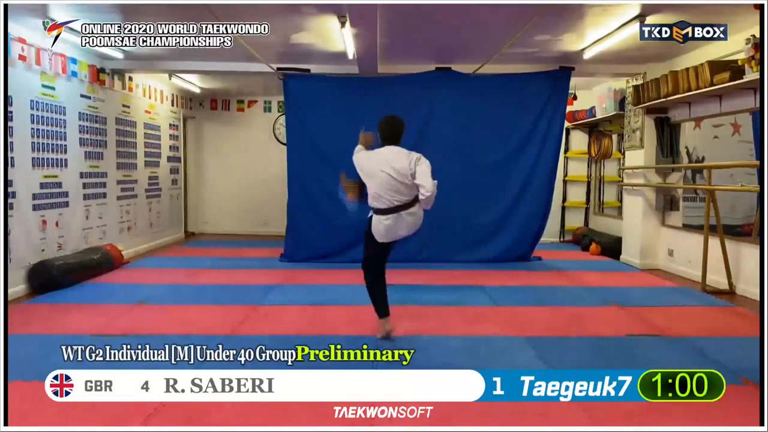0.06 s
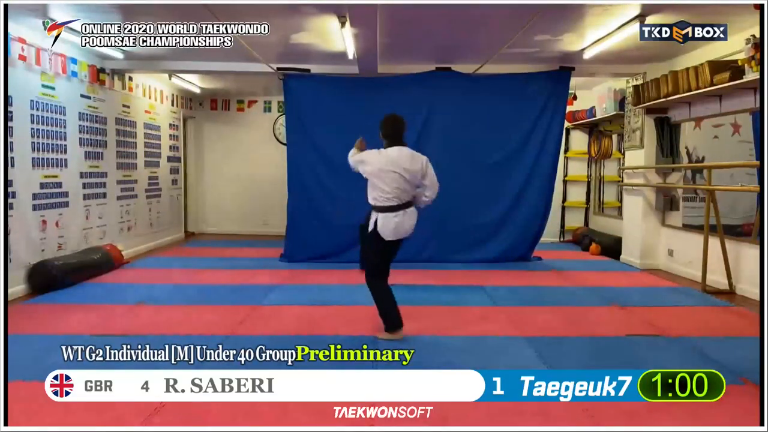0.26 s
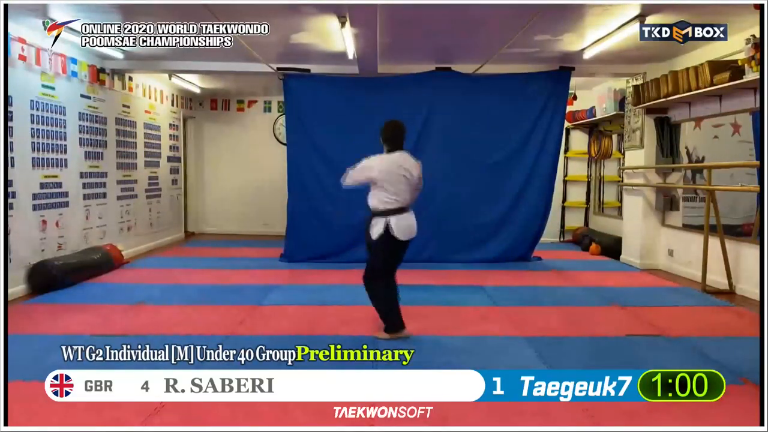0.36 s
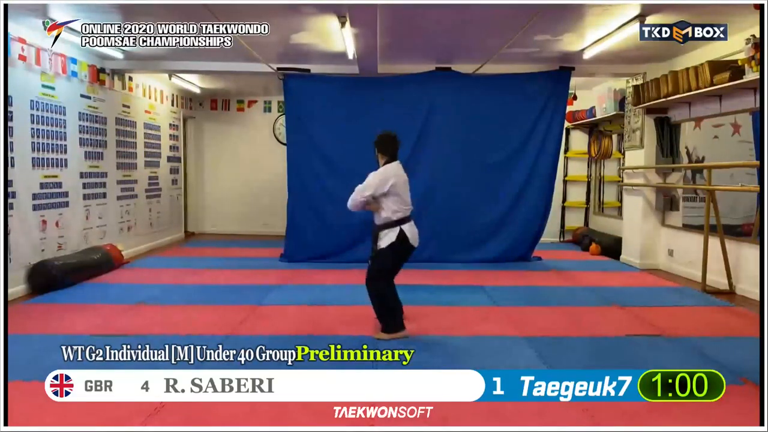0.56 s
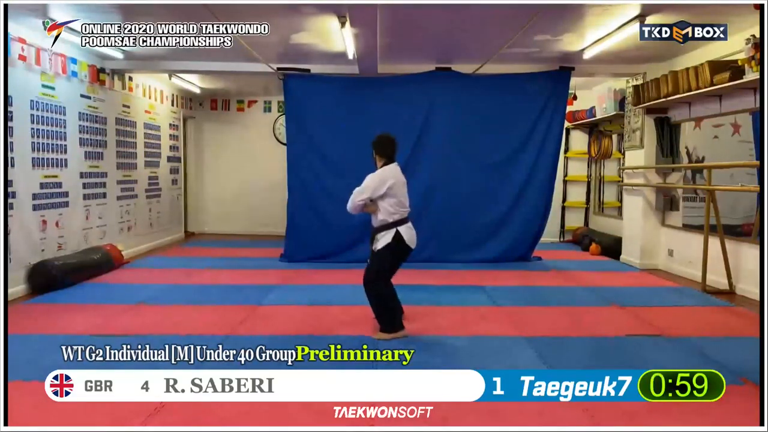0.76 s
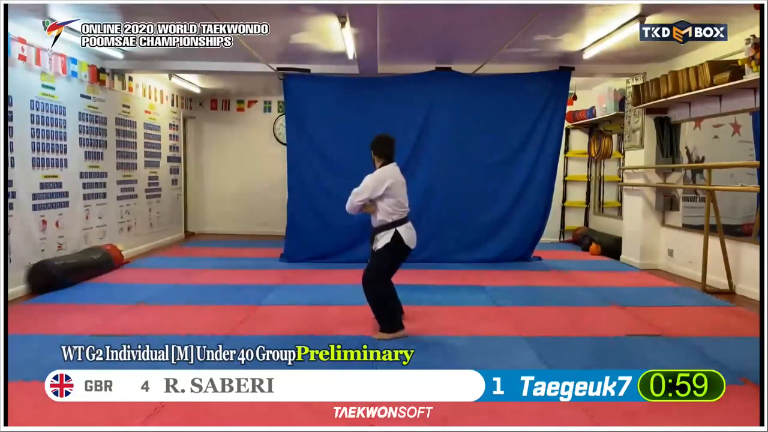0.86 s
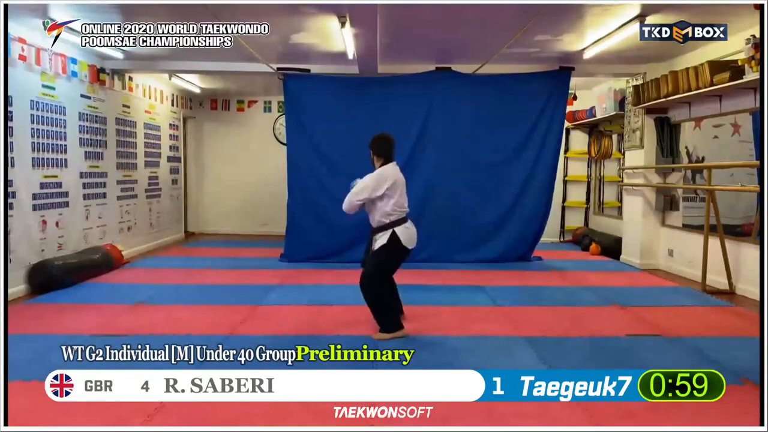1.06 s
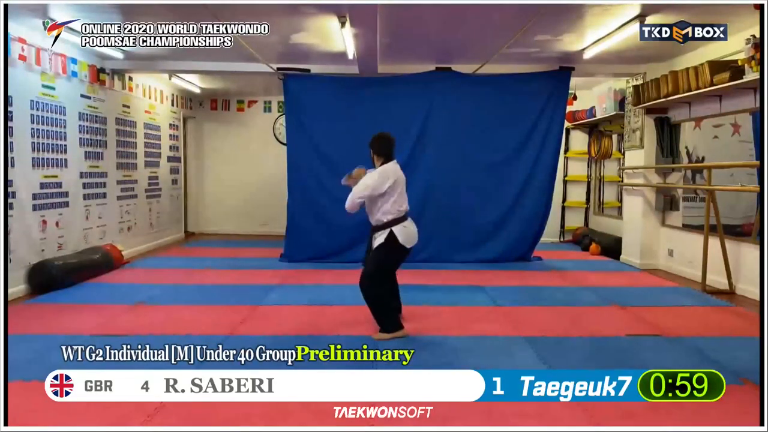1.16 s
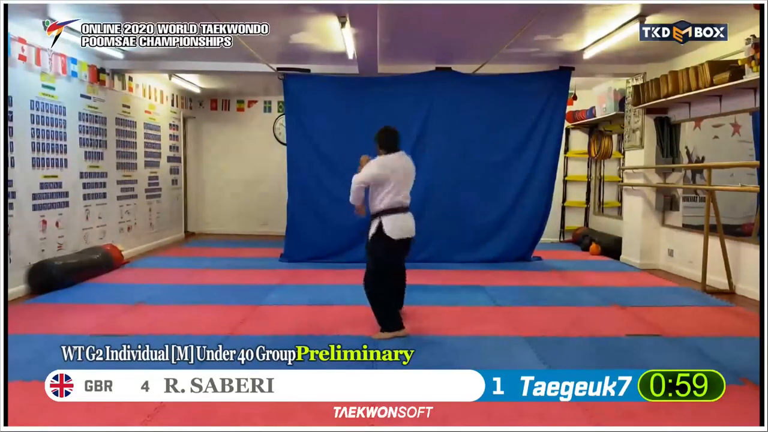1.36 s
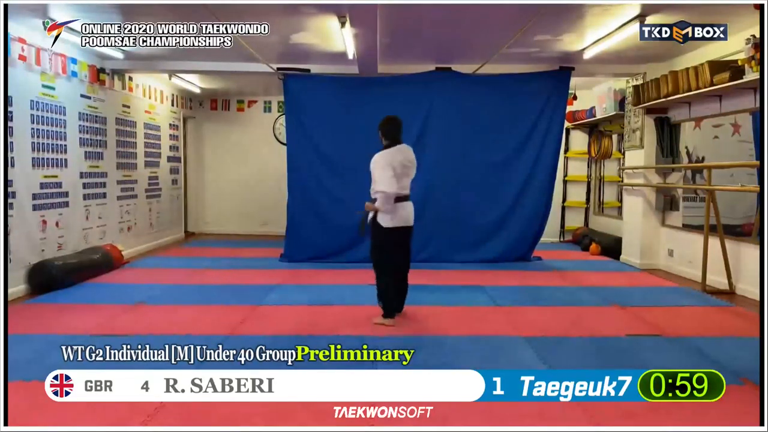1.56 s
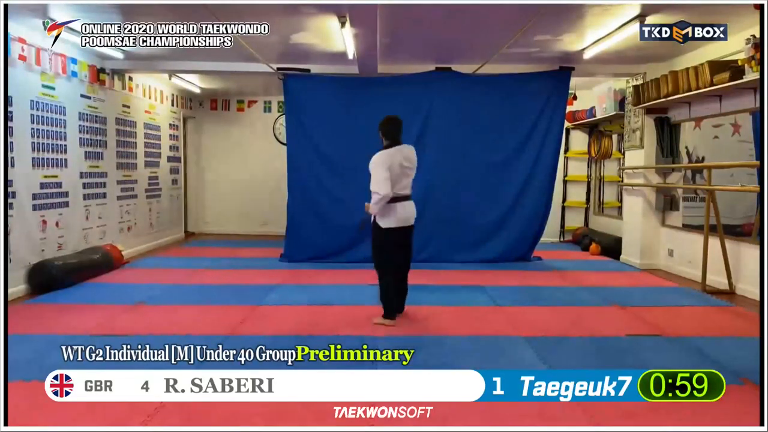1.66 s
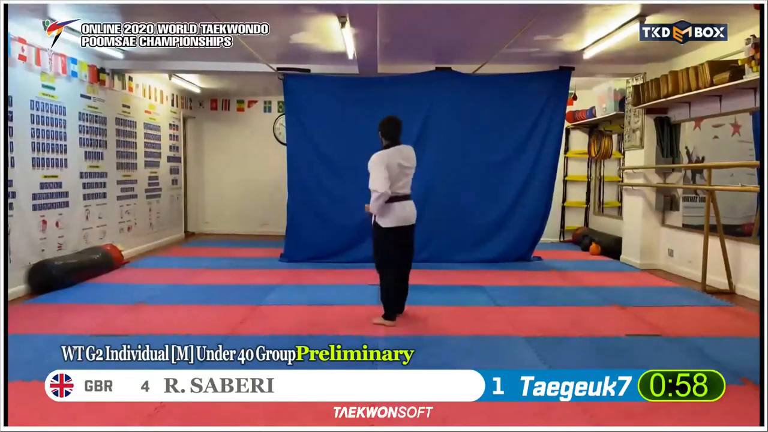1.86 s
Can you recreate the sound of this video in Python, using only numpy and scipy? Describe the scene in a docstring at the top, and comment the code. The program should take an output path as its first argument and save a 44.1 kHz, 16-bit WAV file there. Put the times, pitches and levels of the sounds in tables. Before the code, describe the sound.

A loose cotton uniform rustles at the start, then cracks hard in a tight cluster of snaps at about 0.2 seconds as a foot thuds on foam mats. A thin hem flick and swish fade by 0.5, with bare-room ringing and a deep floor boom. Near quiet follows over faint ventilation rumble. At 1.2 a softer step lands, with sleeves swishing until about 1.35, then quiet returns.

```python
"""A martial artist in a loose cotton uniform lands on foam mats and strikes: cloth cracks taut, the foot thuds.
A second later he draws up with a softer step and a long swish of sleeves.
Snaps and steps are pressure pulses with noise flutter; swishes are noise and crease clicks under slow envelopes.
The bare training room rings after each move; a deep floor mode and low ventilation rumble lie beneath."""
import sys
import numpy as np
from scipy import signal
from scipy.fft import rfft, irfft, next_fast_len
from scipy.io import wavfile

SR = 44100
rng = np.random.default_rng(int(sys.argv[2]) if len(sys.argv) > 2 else 0)


def put_to_file(sound):
    """Save the sound as 16-bit audio at rate SR, in the file named by the first command-line argument."""
    columns = np.atleast_2d(sound).T  # one column per channel
    safe = np.clip(columns, -1, 1)
    whole_steps = np.round(safe * 32767)
    wavfile.write(sys.argv[1], SR, whole_steps.astype(np.int16))


N = 83790


def amp(db):
    """Level to amplitude ratio: 20 dB is a factor of ten."""
    return 10 ** (np.asarray(db) / 20)


def along(points, hz):
    """Interpolation of (frequency, value) points on a logarithmic frequency axis."""
    f, v = np.transpose(points)
    return np.interp(np.log(hz + 1), np.log(f + 1), v)


def unit(x):
    """Normalisation to an rms of 1."""
    return x / np.sqrt(np.mean(x ** 2) + 1e-20)


def filtered(x, response):
    """Linear filtering: the spectrum of x times a response of frequency."""
    size = next_fast_len(x.shape[-1] + SR // 4)  # zero padding holds the filter's ringing
    spectrum = rfft(x, size) * response(np.fft.rfftfreq(size, 1 / SR))
    return irfft(spectrum, size)[..., :x.shape[-1]]


def spectral_gain(colour, tilt_db, hz):
    """Spectral envelope: a colour curve plus a tilt in dB per octave above 100 Hz."""
    return amp(along(colour, hz) + tilt_db * np.log2(np.maximum(hz, 100)))


def coloured(x, colour):
    """Spectral shaping of x by a colour curve, at rms 1."""
    return unit(filtered(x, lambda hz: spectral_gain(colour, 0, hz)))


def diffuse(size):
    """Diffuse field: stereo noise, correlated in the bass and far less so in the treble."""
    # left-right likeness: (frequency [Hz], correlation [-1 to 1])
    likeness = [(60, .95), (130, 0.82), (290, 0.86), (640, -0.0042), (1400, 0.081), (7000, 0.18),
                (15000, -0.75)]
    correlation = np.clip(along(likeness, np.fft.rfftfreq(size, 1 / SR)), -.99, .99)
    turn = np.arccos(correlation) / 2
    spectra = rfft(rng.standard_normal((2, size))) * [np.cos(turn), np.sin(turn)]
    mid, side = irfft(spectra, size)
    return np.array([mid + side, mid - side])


def fade(t, t60):
    """Exponential decay by 60 dB in t60 seconds."""
    return np.exp(-np.log(1000) * t / t60)


def blow(start, attack, t60, size=N):
    """Impact envelope: a saturating rise times an exponential decay."""
    t = np.maximum(np.arange(size) / SR - start, 0)
    return (1 - np.exp(-t / attack)) * fade(t, t60)


def ventilation_rumble():
    """Broadband flow noise: steady diffuse noise weighted to the bass."""
    # rumble spectrum: (frequency [Hz], level [dB])
    rumble_colour = [(20, -16), (35, -9.5), (58, 3.5), (80, -3), (102, -1), (140, -11.5), (290, -12.5),
                     (450, -29), (800, -22.5), (1500, -29.5), (3000, -40), (6000, -50.5), (15000, -65)]
    return amp(-57) * coloured(diffuse(size=N), rumble_colour)


def floor_boom():
    """Modal vibration: one deep mode of the floor flexes under the shifting weight."""
    # booms: (time [s], level of the decay without its slow rise [dB], t60 [s])
    booms = [(0.214, -32, 0.68), (0.601, -40, 0.42), (1.376, -38.5, 0.37), (1.781, -42.5, 0.41)]
    mode_hz, attack_s = 49.7, 0.095
    t = np.arange(N) / SR
    out = np.zeros(N)
    for s, db, t60 in booms:
        out += amp(db) * blow(s, attack_s, t60) * np.sin(2 * np.pi * mode_hz * (t - s))
    return out


def room(x):
    """Reverberation: direct sound, near walls and a tail decaying at a rate set by frequency."""
    # decay of the tail: (frequency [Hz], t60 [s])
    decay_times = [(60, 0.2), (160, 0.9), (230, 0.83), (330, 0.96), (570, 0.34), (850, 0.88), (1050, 0.86),
                   (1250, 0.97), (1600, 0.81), (3500, 0.67), (5300, 0.66), (8000, 0.55), (11000, 0.38),
                   (14000, 0.33)]
    tail_db, early_db = 2.5, 0  # energy relative to the direct sound
    early_t60_s, first_wall_s = .09, 0.0025
    noise = diffuse(size=SR)
    hz, t, bands = signal.stft(noise, SR, nperseg=512)
    bands = bands * fade(t, along(decay_times, hz)[:, None])
    tail = signal.istft(bands, SR, nperseg=512)[1][:, :SR]
    tail *= 1 - np.exp(-np.arange(SR) / SR / first_wall_s)  # gradual build-up
    early = noise[:, ::-1] * blow(first_wall_s, 0.00035, early_t60_s, size=SR)
    answer = (amp(tail_db) * unit(tail) + amp(early_db) * unit(early)) / np.sqrt(SR)
    answer[:, 0] += 1  # direct sound
    return signal.fftconvolve(x[None], answer, axes=1)[:, :N]


def standing_waves(hz):
    """Modal resonance: second-order room modes lift a few narrow bands."""
    # room modes: (frequency [Hz], width [Hz], lift [dB])
    modes = [(401.7, 9.6, 8), (511, 20, 4), (597, 11, 4), (641, 25, 8), (790, 29, 4), (1109, 12, 5.5),
             (1314, 10, 1.5), (1590, 13, 4), (4888, 98, 1)]
    response = 1
    for centre, width, db in modes:
        damping = 1j * hz * width
        response = response + (amp(db) - 1) * damping / (centre * centre - hz * hz + damping)
    return response


def placing(hz):
    """Interaural cues: a level difference by frequency and a small arrival lag."""
    # stereo lean: (frequency [Hz], left minus right level [dB])
    lean = [(100, -1), (600, 0.6), (1300, 1), (4400, 2.5), (9000, 1.1), (15000, 0)]
    left_lag_s = .000045  # the left microphone hears the moves slightly later
    levels = amp(np.outer([.5, -.5], along(lean, hz)))
    return levels * np.exp(np.outer([-1j, 1j], np.pi * hz * left_lag_s))


def pulse(colour, tilt_db):
    """Minimum phase: a causal pressure pulse of energy 1 with the given spectrum and tilt."""
    size = 4096
    hz = np.fft.rfftfreq(size, 1 / SR)
    cepstrum = irfft(np.log(spectral_gain(colour, tilt_db, hz)))
    # folding the cepstrum onto positive times makes the pulse causal
    cepstrum[1:size // 2] *= 2
    cepstrum[size // 2:] = 0
    shape = irfft(np.exp(rfft(cepstrum)))
    return shape / np.linalg.norm(shape)


def hits(table, colour, attack):
    """Impact radiation: each hit is a pulse and a short flutter with its own room response."""
    pulse_share = .15  # share of a hit's energy in its first pressure pulse
    out = np.zeros((2, N))
    for s, db, t60, tilt in table:
        push = pulse(colour, tilt)
        envelope = blow(0, attack, t60, size=len(push))
        noise = envelope * rng.standard_normal(len(push))
        flutter = signal.fftconvolve(noise, push)[:len(push)]
        flutter /= np.linalg.norm(flutter)
        burst = np.sqrt(1 - pulse_share) * flutter - np.sqrt(pulse_share) * push
        start = round(s * SR)
        sound = room(amp(db) * np.linalg.norm(envelope) * burst)[:, :N - start]
        out[:, start:start + sound.shape[1]] += sound
    return out


def foam_thuds():
    """Damped impact: body weight sinks into the foam, with a slower onset and a dull spectrum."""
    # thuds: (time [s], level [dB], t60 [s], treble tilt [dB per octave])
    thuds = [(.216, -29, 0.1, -1.5), (1.006, -49.5, 0.047, 3), (1.195, -38.5, 0.085, -8.5),
             (1.405, -53, 0.047, 2)]
    # thud spectrum: (frequency [Hz], level [dB])
    thud_colour = [(40, -24.5), (90, -7.5), (170, 3.5), (240, -11), (320, 1), (450, -10.5), (800, -27.5),
                   (2000, -50.5), (15000, -89)]
    return hits(thuds, thud_colour, attack=0.0045)


def footsteps():
    """Contact impact: feet meet the mat with a quick onset."""
    # steps: (time [s], level [dB], t60 [s], treble tilt [dB per octave])
    steps = [(.079, -42.5, 0.03, 1.5), (.1975, -22, 0.029, 2.5), (.2012, -16.5, 0.071, -0.5),
             (1.167, -47.5, 0.075, -3.5), (1.1835, -30.5, 0.034, -1), (1.194, -31.5, 0.034, -2),
             (1.243, -41, 0.053, -2), (1.308, -42.5, 0.15, 0)]
    # step spectrum: (frequency [Hz], level [dB])
    step_colour = [(40, -21.5), (110, -11.5), (220, -10.5), (350, -5), (520, -3.5), (680, -3.5),
                   (880, -10.5), (1100, -21), (2000, -22.5), (4000, -31), (8000, -41.5), (15000, -52)]
    return hits(steps, step_colour, attack=0.00095)


def swishes():
    """Friction noise: rubbing weave and tiny buckling creases swell and fade with each limb's motion."""
    # swishes: (time of peak [s], level [dB], rise over 20 dB [s], fall over 20 dB [s])
    # (a negative fall leaves no decay after the peak)
    motions = [(-.01, -46, .1, 0.1061), (0.134, -60.5, 0.12, 0.56), (0.199, -38, .015, 0.025),
               (0.299, -42.5, 0.032, 0.1715), (.78, -75, 0.15, 0.4), (.925, -63.5, 0.13, 0.07),
               (1.203, -47, 0.02, 0.01), (1.252, -43.5, .06, 0.0158), (1.322, -45.5, .1, 0.0436),
               (1.89, -85, .15, -4.18)]
    # swish spectrum: (frequency [Hz], level [dB])
    swish_colour = [(100, -15.5), (300, 2.5), (520, -7.5), (900, -2.5), (1500, -3.5), (2800, -6),
                    (6000, -8.5), (8300, -12), (10500, -11.5), (13000, -16), (15500, -23.5)]
    creases_per_s, crease_share = 1500, .55  # share of energy before colouring
    t = np.arange(N) / SR
    power = np.zeros(N)
    for s, db, rise, fall in motions:
        drop_db = 20 * np.maximum((s - t) / rise, (t - s) / fall)
        power += amp(db - drop_db) ** 2
    creases = unit(rng.standard_normal(N) * (rng.random(N) < creases_per_s / SR))
    rubbing = rng.standard_normal(N)
    friction = np.sqrt(crease_share) * creases + np.sqrt(1 - crease_share) * rubbing
    return room(np.sqrt(power) * coloured(friction, swish_colour))


def hem_flick():
    """Transient noise burst: a loose hem flicks once with a thin tick, without reverberant tail."""
    # flick spectrum: (frequency [Hz], level [dB])
    flick_colour = [(500, -34.5), (4000, -10), (7000, -1.5), (11800, -1), (14000, -15), (15500, -31)]
    envelope = blow(start=.333, attack=0.0022, t60=.018)
    return amp(-19) * envelope * coloured(rng.standard_normal((2, N)), flick_colour)


def cloth_snaps():
    """Sudden tension: cloth pulled taut radiates a sharp crack."""
    # snaps: (time [s], level [dB], t60 [s], treble tilt [dB per octave])
    snaps = [(.2155, -14.5, 0.049, -0.52), (.222, -22.5, 0.04, 0), (.2258, -13.5, 0.011, 3.4),
             (.24, -19, 0.068, -.5), (.267, -18, 0.049, 0)]
    # snap spectrum: (frequency [Hz], level [dB])
    snap_colour = [(50, -14), (110, -12), (180, -3), (300, -14.5), (480, -6.5), (720, -1), (1000, 0),
                   (1300, 3.5), (1700, -7), (2300, -9.5), (3500, -12), (5200, -8), (7000, -14), (8500, -19),
                   (10200, -12.5), (12500, -20.5), (15500, -29.5)]
    return hits(snaps, snap_colour, attack=.0006)


def scene():
    """Superposition: cloth and feet, shaped by room modes and placing, over boom and rumble."""
    cloth = cloth_snaps() + hem_flick() + swishes()
    feet = footsteps() + foam_thuds()
    moves = filtered(cloth + feet, lambda hz: standing_waves(hz) * placing(hz))
    return moves + floor_boom() + ventilation_rumble()


def record(dry):
    """Band limiting: the recorder keeps nothing from 15750 Hz upward."""
    return filtered(dry, lambda hz: hz < 15750)


dry = scene()
out = record(dry)
put_to_file(out)
```